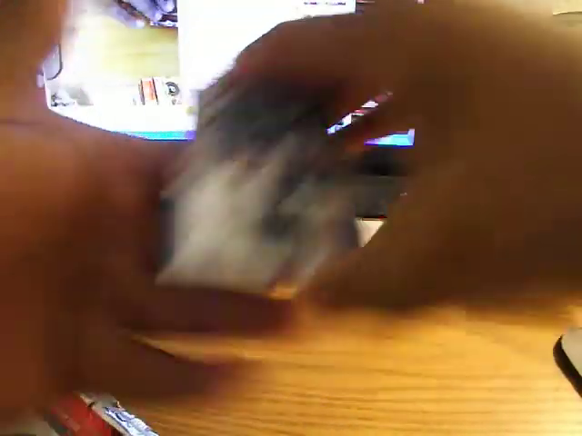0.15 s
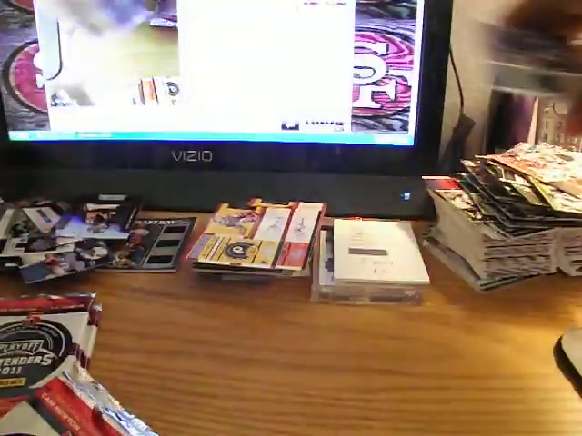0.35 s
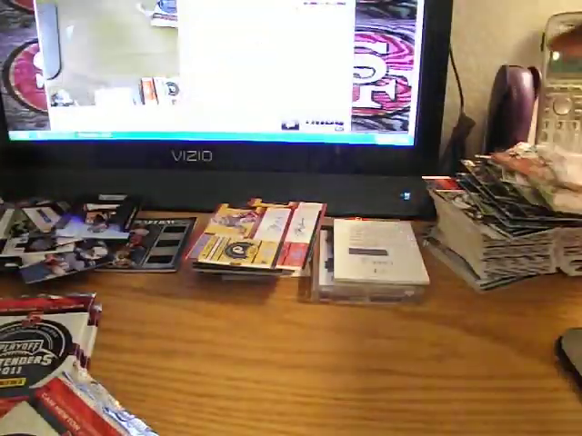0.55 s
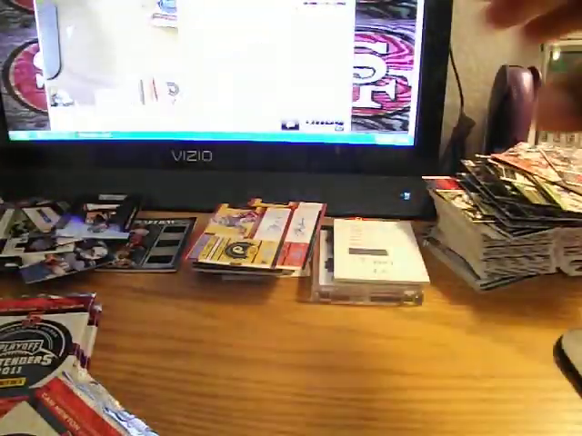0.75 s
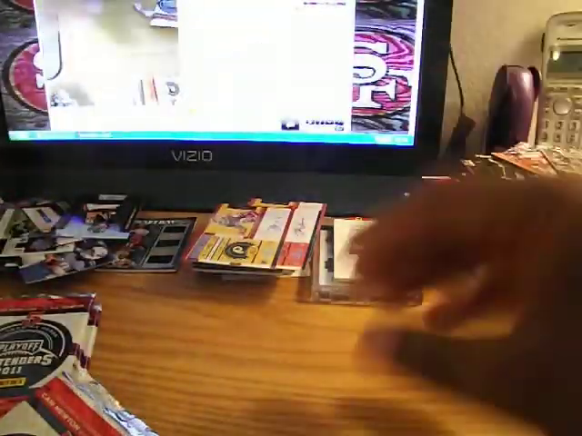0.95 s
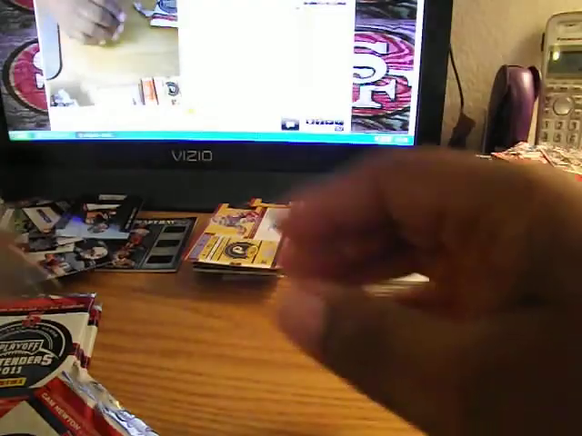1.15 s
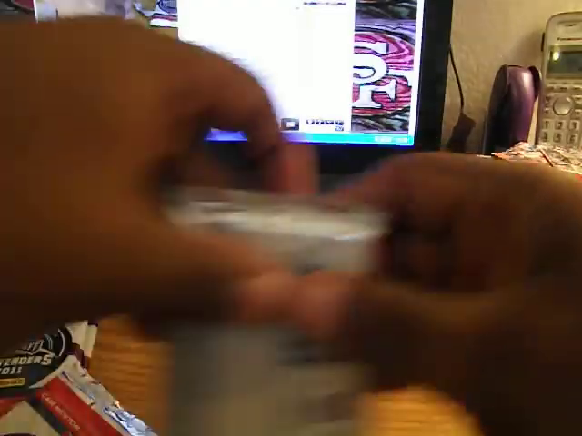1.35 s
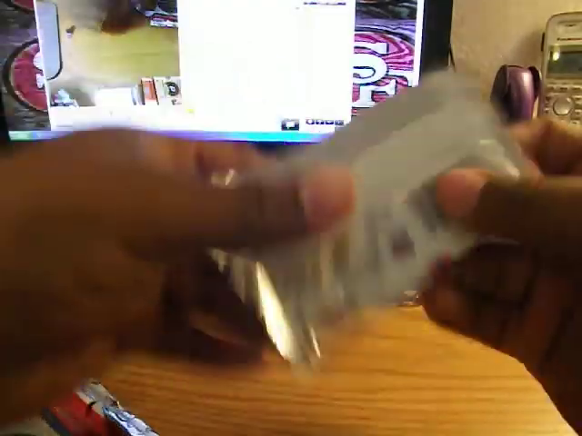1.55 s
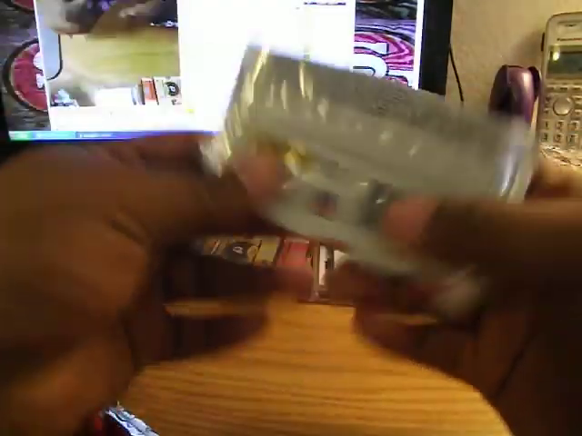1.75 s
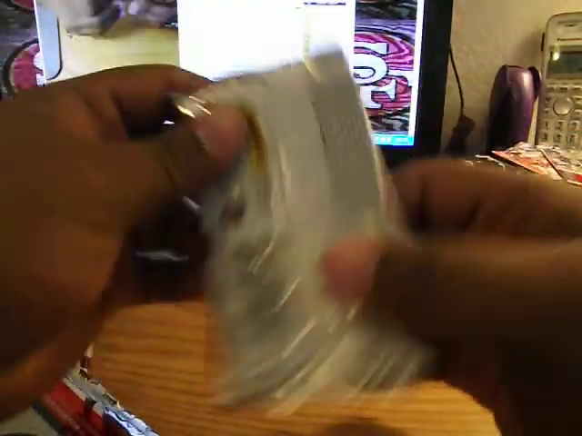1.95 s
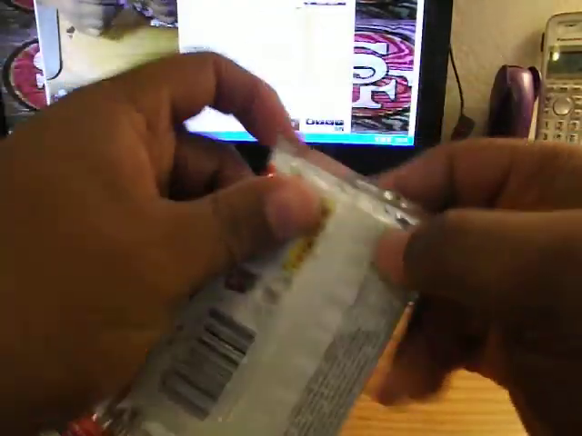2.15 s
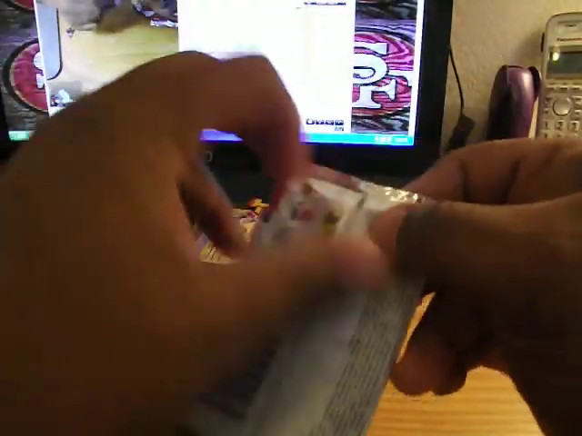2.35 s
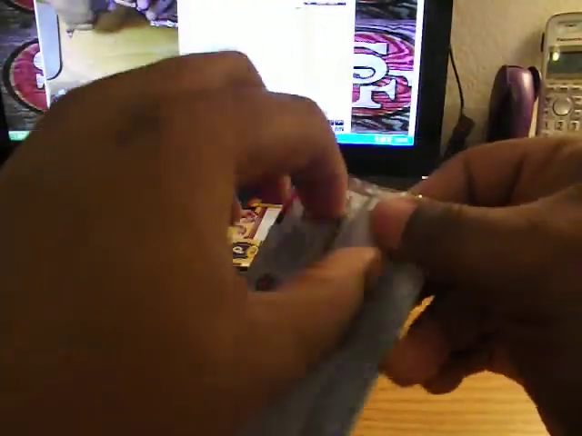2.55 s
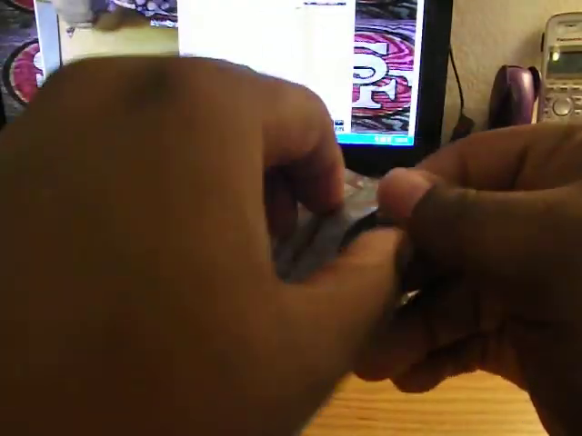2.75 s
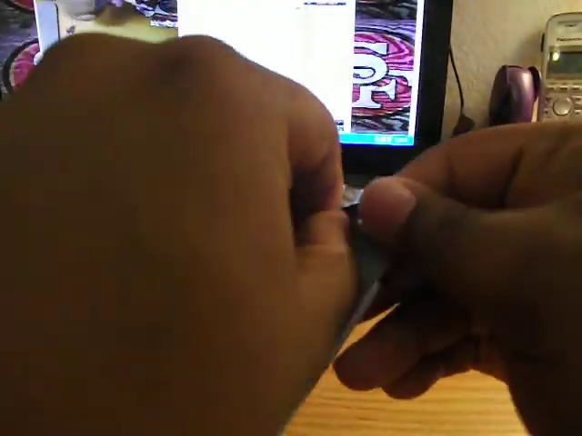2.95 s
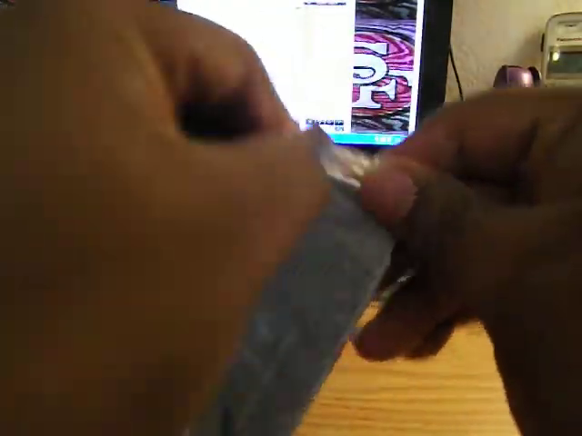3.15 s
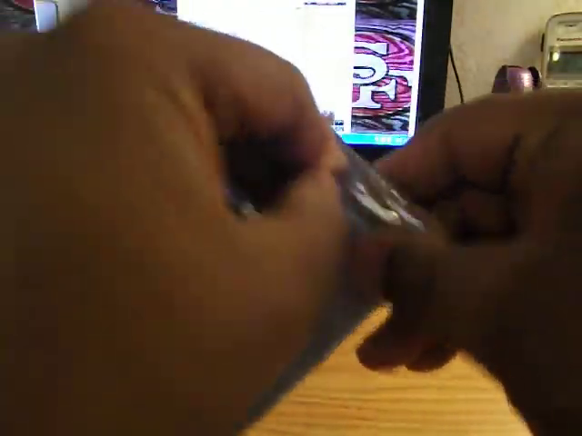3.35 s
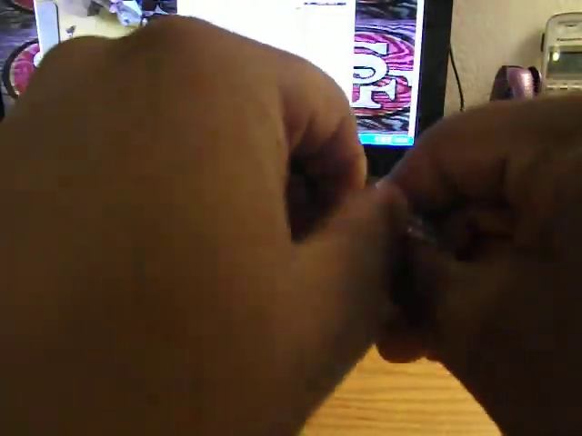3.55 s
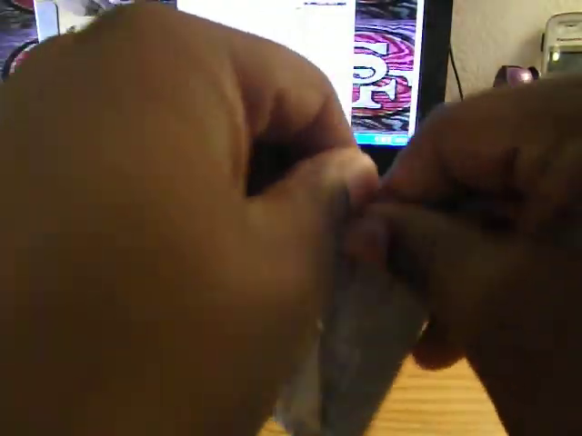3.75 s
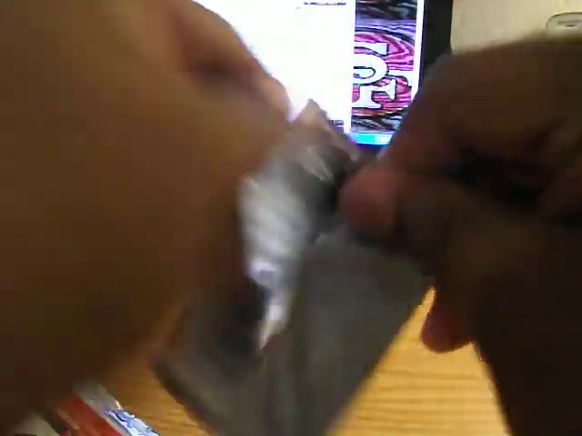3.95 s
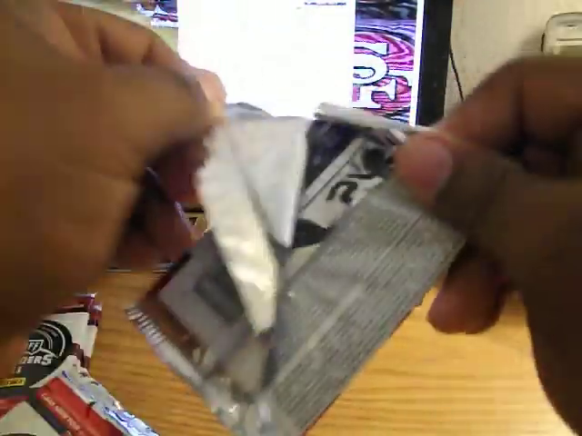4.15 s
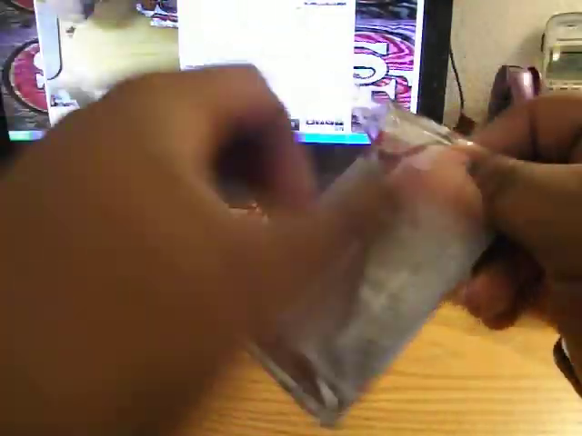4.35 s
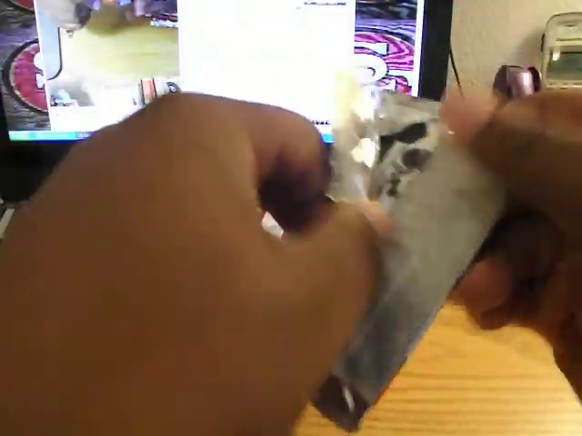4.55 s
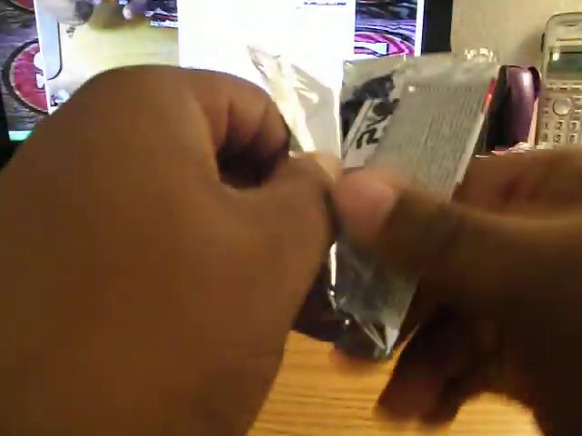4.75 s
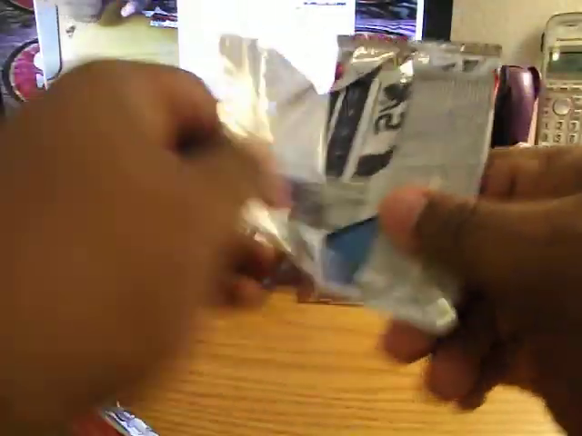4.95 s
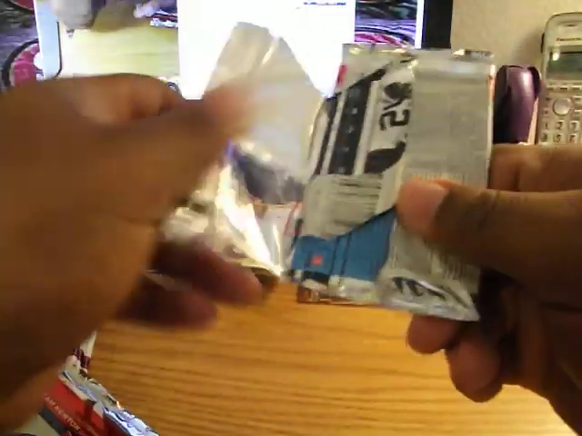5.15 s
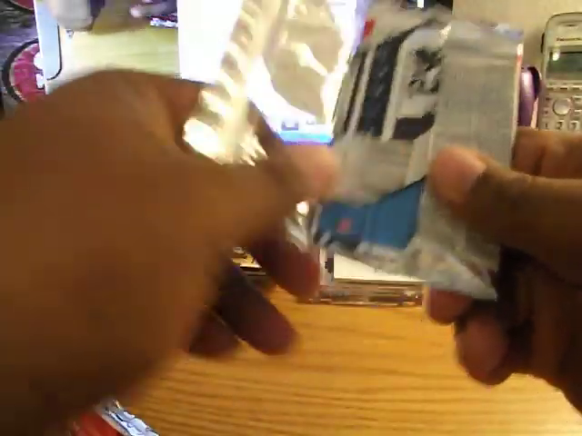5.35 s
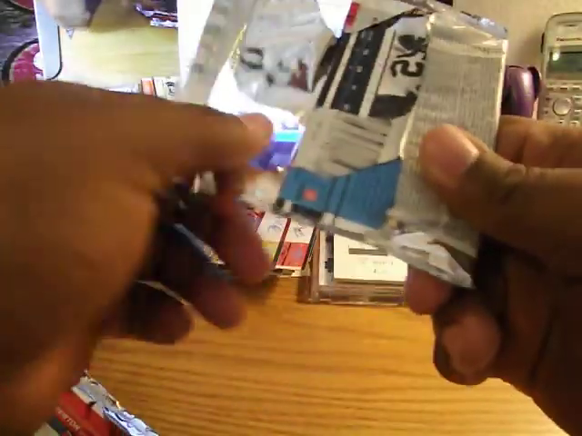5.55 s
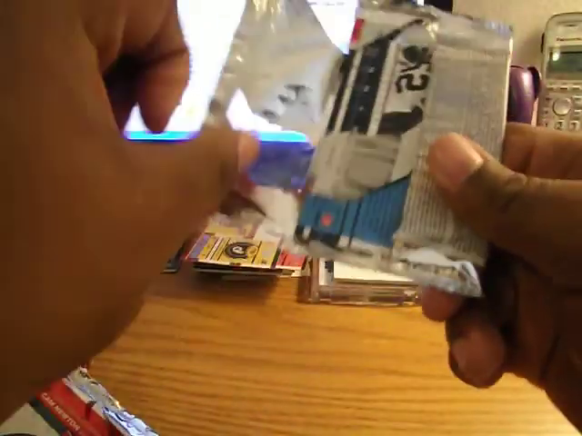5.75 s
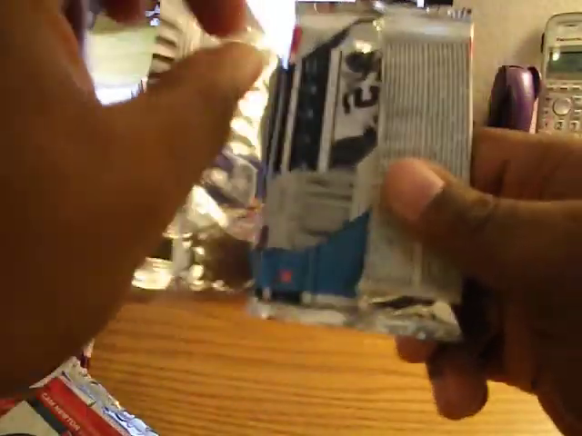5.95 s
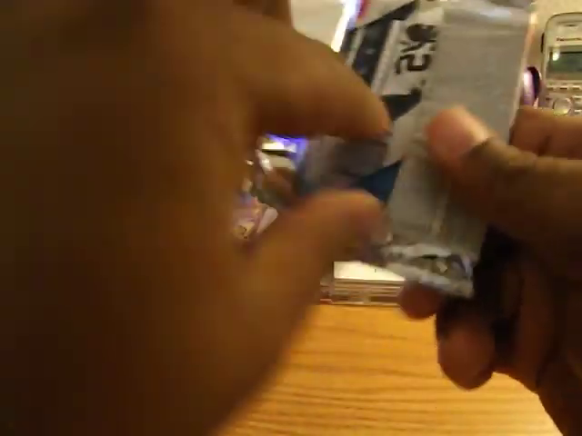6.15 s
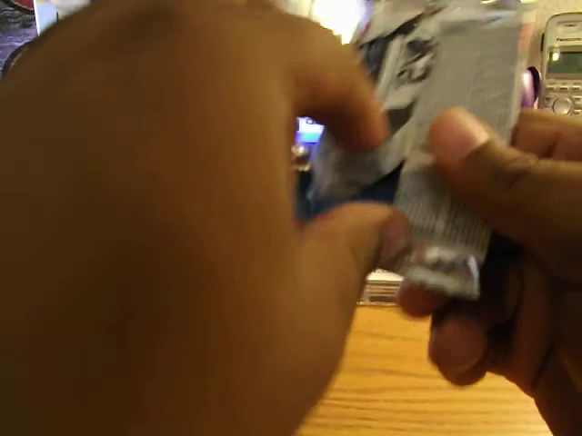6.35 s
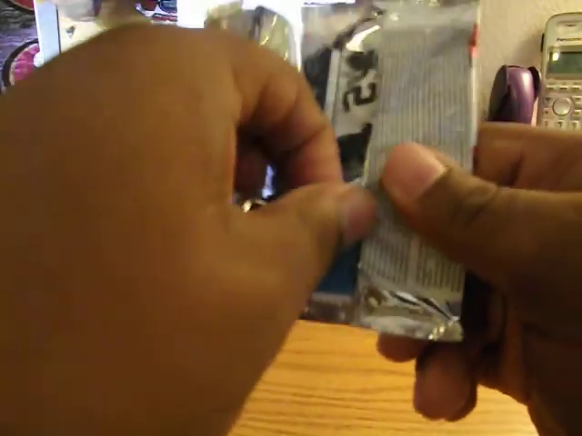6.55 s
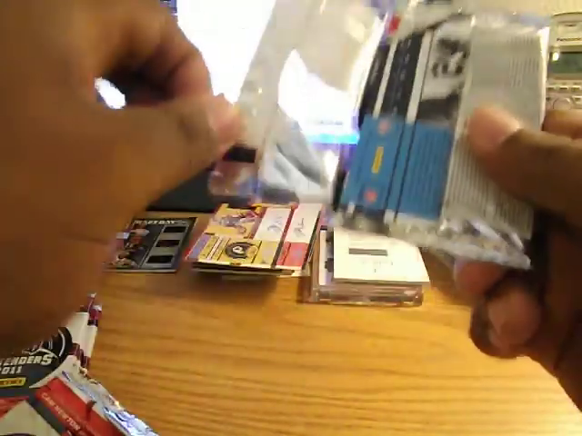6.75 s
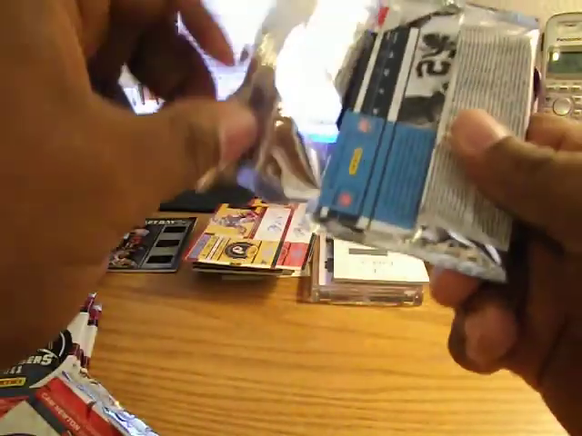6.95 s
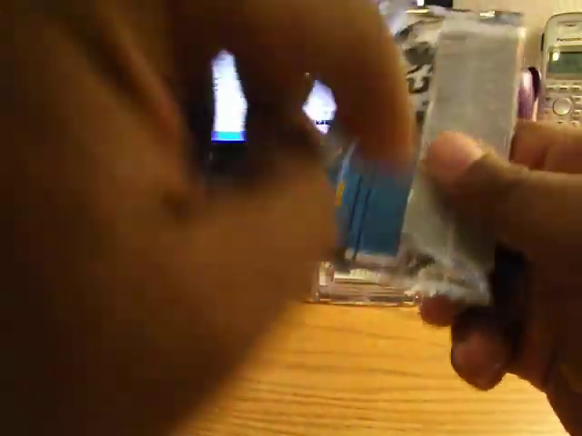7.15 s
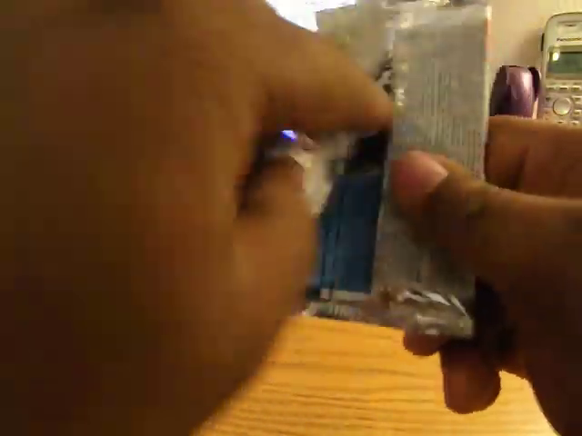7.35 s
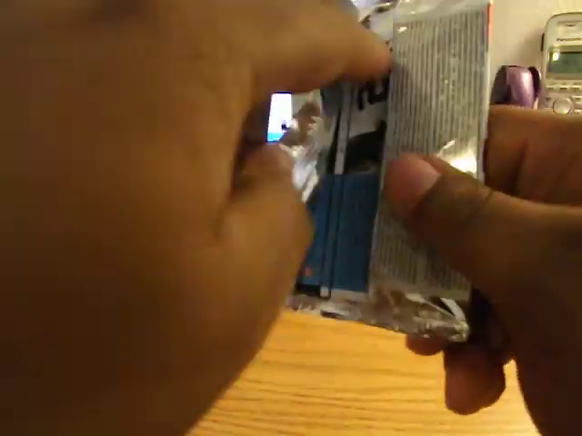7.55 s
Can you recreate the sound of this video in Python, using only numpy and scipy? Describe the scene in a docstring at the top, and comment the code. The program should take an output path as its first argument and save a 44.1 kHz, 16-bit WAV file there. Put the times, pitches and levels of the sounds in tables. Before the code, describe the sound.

A close, dull microphone in a small indoor room, with faint hiss, low rumble and hum throughout. At 0-0.4 s cards slide with a soft swelling brush and a finger bump; at 0.55 s they land on a stack with a light double tap. From 0.6 to 2 s foil is picked up: sparse ticks, a sharp snap near 0.95, light rustle. From 2 to 2.9 s pinching brings denser, brighter crackles. Hard crunching bursts come around 3.0 and 3.9 s, with smaller snaps between. Crinkling builds from 4.4 to the loudest rip at 4.85-4.97 s, slightly distorted with a hollow thump, and the level ducks afterwards. From 5 to 6.3 s, looser peeling rustles and low finger bumps; a very deep drone enters at 5.5 s and later sags. Strong tearing returns at 6.4-6.65 s, then quieter crinkles, and a short burst at 7.3 s before final snaps near 7.45 s.

```python
"""A foil pack is picked up, pinched, torn open and peeled back at a desk, close to a small microphone.
Creases snap one by one as noise bursts ringing a resonance, over a fine crinkle of random clicks.
First, cards are slid away as swelling filtered noise and dropped on a stack as short noise bursts.
Finger bumps are damped modes; behind lie noise-made hiss, sine hum and, later, a deep sine drone.
The microphone channel is dull above 5 kHz, ducks after loud rips and clips the sharpest snaps."""
import sys
import numpy as np
from scipy import signal
from scipy.fft import rfft, irfft
from scipy.io import wavfile
from scipy.ndimage import uniform_filter1d

SR = 44100
rng = np.random.default_rng(int(sys.argv[2]) if len(sys.argv) > 2 else 0)


def persist_wave(psi):
    """Save psi, clipped to +-1, as 16-bit WAV."""
    counts = np.round(np.clip(psi, -1, 1) * 32767).astype(np.int16)
    wavfile.write(sys.argv[1], SR, np.atleast_2d(counts).T)


N = 335601
TIME = np.arange(N) / SR

# cards landing on the stack; level is that of the card edge, rms over 0.1 s
# columns: start_s [s], level_db [dB]
CARD_LANDINGS = [(0.5475, -27.5), (0.5545, -35)]
# relative spectrum of a low rasp, shared by cards and foil
# columns: frequency_hz [Hz], density_db [dB per Hz]
RASP_SPECTRUM = [(150, -8.5), (350, -0.5), (500, -16.5), (800, 1.5), (1200, -6), (1650, 0.5), (2200, -5),
                 (3200, -50)]


def undb(db):
    """Amplitude ratio: 20 dB is a factor of ten."""
    return 10 ** (np.asarray(db) / 20)


def unit(x):
    """Power normalization: scale to rms 1."""
    return x / np.sqrt(np.mean(x ** 2) + 1e-18)


def add(out, s, x):
    """Superposition: mix a short sound in at time s."""
    i = max(int(s * SR), 0)
    out[i:i + len(x)] += x[:max(N - i, 0)]


def resonate(x, hz, width_hz):
    """Two-pole resonance with gain 1 at the centre."""
    return signal.lfilter(*signal.iirpeak(hz, hz / width_hz, fs=SR), x)


def colour(x, points):
    """Minimum-phase filtering: a causal response with the given spectrum; the result has rms 1."""
    hz, db = np.transpose(points)
    size = 4096
    bin_hz = np.arange(size // 2 + 1) * SR / size
    bin_db = np.interp(np.log(bin_hz + 1), np.log(hz), db)
    # folding the cepstrum onto positive times makes the response causal
    cepstrum = irfft(np.log(undb(bin_db)))[:size // 2]
    cepstrum[1:] *= 2
    response = irfft(np.exp(rfft(cepstrum, size)))
    return unit(signal.fftconvolve(x, response)[:N])


def walk(rate):
    """Low-pass noise: a slow random wander, smoothed twice over 1 / rate seconds."""
    k = int(SR / rate)
    steps = np.repeat(rng.standard_normal(N // k + 1), k)
    return unit(uniform_filter1d(uniform_filter1d(steps, k), k)[:N])


def tone(hz):
    """Phase accumulation: a sine of rms 1 that follows a pitch curve."""
    return unit(np.sin(2 * np.pi * np.cumsum(hz) / SR))


def grains(rate, spread_db):
    """Shot noise: random tiny clicks, many weak and a few strong, at a mean rate per second."""
    sizes = undb(spread_db * np.minimum(rng.exponential(size=N), 3)) * rng.choice([-1, 1], N)
    return sizes * (rng.random(N) < rate / SR)


def steady(x, span_s=0.04):
    """Power levelling: hold the mean power near 1 while single clicks still stand out."""
    local_power = np.abs(uniform_filter1d(unit(x) ** 2, int(span_s * SR)))
    return x / np.sqrt(local_power + 0.0086) / np.sqrt(np.mean(x ** 2))


def gesture(start_s, length_s, db, growth_db):
    """Amplitude envelope of a hand movement: quick attack before start_s, changing hold, exponential release."""
    attack_s, release_s = 0.02, 0.0086
    t = TIME - start_s
    progress = np.clip(t / length_s, 0, 1)
    attack = np.clip(1 + t / attack_s, 0, 1) ** 2
    release = np.exp(-np.maximum(t - length_s, 0) / release_s)
    return undb(db + growth_db * (progress - .5)) * attack * release


def gestures(rows):
    """Incoherent summation: the powers of several hand movements add."""
    return np.sqrt(sum(gesture(*row) ** 2 for row in rows))


def drone(start_s=5.5, rise_s=0.0486, level_db=-32, pitch_hz=31.75):
    """Frequency glide: a deep sine sets in quickly, then later sags steadily in pitch."""
    sag_s, sag_hz_per_s = 6.65, 3.2
    onset = np.clip((TIME - start_s) / rise_s, 0, 1)
    pitch_curve_hz = pitch_hz - sag_hz_per_s * np.maximum(TIME - sag_s, 0)
    return undb(level_db) * onset * tone(pitch_curve_hz)


def background(waver_db=0.6, waver_hz=.9, flicker_db=1.9):
    """Stationary noise and tones: room rumble, hiss with two resonances, wavering hum and the drone."""
    # relative spectrum of the room rumble: frequency_hz [Hz], density_db [dB per Hz]
    room_spectrum = [(20, 5.5), (60, -3), (100, -2), (135, -3), (165, -15), (200, -16.5), (320, -13.5),
                     (450, -21), (800, -24), (1400, -18.5), (2500, -15), (4500, -32), (6000, -21)]
    # resonances in the hiss: centre_hz [Hz], width_hz [Hz], level_db [dB, before the flicker]
    hiss_bands = [(1922, 110, -48), (4230, 280, -49)]
    # a fan and the mains hum, before the waver: pitch_hz [Hz], level_db [dB]
    hum_tones = [(95, -52), (119.6, -44.5), (299, -61.5)]
    air = undb(-39) * colour(rng.standard_normal(N), room_spectrum)
    hiss = 0
    for hz, width_hz, db in hiss_bands:
        band = unit(resonate(rng.standard_normal(N), hz, width_hz))
        hiss = hiss + undb(db + flicker_db * walk(12)) * band
    hum = sum(undb(db + waver_db * walk(18)) * tone(hz + waver_hz * walk(7)) for hz, db in hum_tones)
    return air + hiss + hum + drone()


def card_slide(peak_s=0.17, width_s=0.088, level_db=-39, rasp_db=-9):
    """Sliding friction: card on card gives a smooth swell of noise, rasping at the height of the movement."""
    # relative spectrum of the slide: frequency_hz [Hz], density_db [dB per Hz]
    slide_spectrum = [(800, -15), (1800, -15), (2700, 0), (3600, 4), (4400, -6.5), (6000, -29)]
    swell = np.exp(-((TIME - peak_s) / width_s) ** 2 / 2)
    friction = rng.standard_normal(N)
    rasp = undb(rasp_db) * swell ** 2 * colour(friction, RASP_SPECTRUM)
    return undb(level_db) * swell * (colour(friction, slide_spectrum) + rasp)


def rub(hz=330, width_hz=85):
    """Resonant friction: soft hollow rubbing while the hands grip, noise through one doubled resonance."""
    # start_s [s, end of the attack], length_s [s], level_db [dB, mid-stroke], growth_db [dB over the stroke]
    rub_strokes = [(0, 0.35, -47.5, 2), (1.88, 0.25, -48, 0.5), (2.3, 0.28, -48, 1.5),
                   (2.68, 0.25, -44.5, -4)]
    friction = rng.standard_normal(N)
    hollow = resonate(resonate(friction, hz, width_hz), hz, width_hz)
    return gestures(rub_strokes) * unit(hollow)


def fingers(bump_db=-2, reach_octaves=0.45):
    """Modal excitation: soft blows ring damped modes, chosen by where the finger lands; skin drags along."""
    # soft bumps of fingers on pack and desk; centre_hz is where the modes ring most
    # start_s [s], level_db [dB peak, before bump_db], centre_hz [Hz]
    bump_rows = [(0.203, -21, 660), (0.547, -31.5, 264), (0.951, -25, 644), (2.025, -32, 270),
                 (2.089, -35, 680), (2.621, -28.5, 676), (2.959, -22.5, 880), (3.872, -20.5, 880),
                 (4.19, -28.5, 720), (4.419, -27.5, 667), (4.89, -20, 680), (4.945, -5, 724),
                 (5.525, -22.5, 300), (5.57, -26, 271), (5.676, -27, 323), (6.061, -30, 233),
                 (6.109, -21.5, 265.5), (6.349, -32.5, 260), (6.511, -17, 290), (6.635, -12.5, 700),
                 (7.32, -35, 277), (7.467, -23, 279)]
    # what a bump rings with: mode_hz [Hz, before 3 % random detuning], level_db [dB], t60_s [s]
    bump_modes = [(170, -8, 0.067), (261, 9.5, 0.11), (297.6, 6, 0.082), (446, 3.5, 0.17),
                  (600, -9.5, 0.07), (674, -2.5, 0.027), (896, -0.5, 0.07)]
    # skin dragging over the pack:
    # start_s [s, end of the attack], length_s [s], level_db [dB, mid-stroke], growth_db [dB over the stroke]
    drag_strokes = [(0, .27, -50, 4), (3.86, 0.031, -38.5, 8), (4.18, 0.054, -46.5, -2),
                    (4.41, 0.35, -54, -1), (4.78, 0.19, -44, 28), (5.28, 0.58, -48, -0.5),
                    (6.01, .14, -41.5, 3), (6.24, 0.12, -38.5, 2), (6.88, .05, -45, -1),
                    (7.28, 0.37, -48.5, -7)]
    # relative spectrum of the drag: frequency_hz [Hz], density_db [dB per Hz]
    skin_spectrum = [(60, -14), (170, 1.5), (260, 0.5), (400, -1), (600, -15), (1200, -30.5)]
    out, t = np.zeros(N), np.arange(SR // 8) / SR
    for s, db, centre_hz in bump_rows:
        ring = 0
        for hz, mode_db, t60_s in bump_modes:
            distance = np.log2(hz / centre_hz) / reach_octaves
            share = 1 / (1 + distance ** 2) * rng.choice([-1, 1])
            detuned_hz = hz * (1 + .03 * rng.standard_normal())
            decay = undb(mode_db - 60 * t / t60_s)
            ring = ring + share * decay * np.sin(2 * np.pi * detuned_hz * t)
        add(out, s, undb(db + bump_db) * ring / np.abs(ring).max())
    return out + gestures(drag_strokes) * colour(grains(rate=260, spread_db=2.0), skin_spectrum)


def cards(rise_s=0.0019, tail_s=0.038, tail_db=-22, stack_db=-17):
    """Impact excitation: two cards meet the stack in quick succession, which knocks and rustles as it settles."""
    out, t = np.zeros(N), np.arange(SR // 10) / SR
    for s, db in CARD_LANDINGS:
        # the air between the cards cushions the landing
        contact = t / rise_s * np.exp(-t / rise_s) + undb(tail_db) * np.exp(-t / tail_s)
        push = contact * rng.standard_normal(len(t))
        edge = unit(resonate(push, 3140, 1800))
        knock = unit(resonate(push, 800, 220))
        add(out, s, undb(db) * (edge + undb(stack_db) * knock))
    return out


def handling(hold_db=-44, hold_rasp_db=-55):
    """Incoherent summation: gains of fine rustle and low rasp, each stroke over the foil being held."""
    # each grip, pull or rip of the foil: start_s [s, end of the attack], length_s [s],
    # rustle_db [dB, mid-stroke], growth_db [dB over the stroke], rasp_db [dB re rustle]
    foil_strokes = [(0.562, 0.1, -39, -5, -15), (0.759, .14, -39, -5, -23), (0.905, 0.078, -31.5, 1, -15),
                    (1.29, 0.01, -33, -2, -13), (1.742, .16, -38.5, 9, -14), (2.082, 0.049, -33, -1, -6.5),
                    (2.214, 0.095, -38, 2, -5), (2.393, .025, -28.5, 1, -23), (2.526, 0.031, -30, 9, -9.5),
                    (2.624, 0.022, -22.5, -6, -25), (2.817, .08, -34, 9, -12.5),
                    (2.934, 0.031, -29, 16.5, -22), (2.979, 0.04, -12.5, 15, -20.5),
                    (3.039, 0.086, -23, -12, -25), (3.216, 0.077, -30, -8, -13.5),
                    (3.335, 0.091, -30.5, 2, -14), (3.553, 0.011, -32.5, -13, -23),
                    (3.699, 0.045, -29.5, 4, -15), (3.825, 0.017, -30, 3, -36), (3.884, .06, -9.5, 4, -20),
                    (3.95, 0.084, -20.5, -3, -6), (4.196, 0.061, -26, -7.5, -11),
                    (4.475, 0.047, -22, 10, -11.5), (4.544, 0.091, -27.5, 7, -11.5),
                    (4.70, 0.16, -26, 12.5, -13.5), (4.859, 0.098, -11, 16, -5),
                    (4.982, 0.23, -33.5, -12, -6.5), (5.247, 0.13, -31.5, -5, -5.5),
                    (5.319, 0.16, -26.5, -7.5, -8), (5.51, 0.17, -29, -1.5, -4.5),
                    (5.713, 0.11, -37, 2, -5.5), (6.028, 0.16, -37, -8, -5), (6.242, 0.24, -30.5, -0.5, -6),
                    (6.463, 0.15, -21, 5, -18.5), (6.606, 0.039, -13, 6.5, -12),
                    (6.673, 0.096, -32, -3.5, -13.5), (6.885, 0.094, -32.5, -8.5, -13),
                    (7.011, 0.019, -33, 7, -9.5), (7.119, 0.021, -34, 3, -18),
                    (7.224, 0.097, -28.5, 22.5, -13.5), (7.328, .035, -26, 5, -13.5),
                    (7.43, 0.058, -31, 9, -6)]
    held = TIME > CARD_LANDINGS[0][0]
    fine = gestures(row[:4] for row in foil_strokes)
    rasp = gestures((s, length, db + rasp_db, growth) for s, length, db, growth, rasp_db in foil_strokes)
    return np.hypot(fine, undb(hold_db) * held), np.hypot(rasp, undb(hold_rasp_db) * held)


def crinkle(fine, rasp, crest=3.6, facet_width_hz=560, facet_db=2, slide_db=-13):
    """Crackling noise: countless small creases give way as the foil slides and tears."""
    # relative spectrum of the fine rustle: frequency_hz [Hz], density_db [dB per Hz]
    crinkle_spectrum = [(500, -36), (1200, -7.5), (1700, -10.5), (2200, 1.5), (2900, 17.5), (3300, 27),
                        (3800, 2.5), (4500, 8.5), (5200, -11), (6000, -35)]
    tearing = unit(grains(rate=420, spread_db=2.5)) + undb(slide_db) * rng.standard_normal(N)
    facets = 0
    for hz in (3000, 2730, 2880, 3100, 3920, 4500, 4320):
        facets = facets + resonate(grains(rate=70, spread_db=1.5), hz, facet_width_hz)
    foil = steady(colour(tearing, crinkle_spectrum) + undb(facet_db) * unit(facets))
    foil = crest * np.tanh(foil / crest)  # a small crease stores only so much energy
    return fine * foil + rasp * steady(colour(tearing, RASP_SPECTRUM))


def burst(t, length_s, break_db=-3):
    """Impulsive release: a crease breaks at once, then a flurry of tiny slips dies away."""
    push = rng.standard_normal(len(t)) * np.exp(-(t / length_s) ** 2)
    push /= np.linalg.norm(push)
    push[0] += undb(break_db)
    return push


def snaps(rows, ring_width_hz=1100, neighbour_width_hz=380, neighbour_db=-7, edge_db=-6):
    """Buckling: a crease's own facet rings for a millisecond or two; sheet and pack answer lower down."""
    lag_s, body_db, thud_db = .0003, -1, -10
    slip_s, slip_octaves = 0.0033, .55  # typical slipping time after the break, and its random spread
    out, t = np.zeros(N), np.arange(SR // 50) / SR
    edge_band = signal.butter(2, [2500, 5800], "band", fs=SR, output="sos")
    body_band = signal.butter(2, [1450, 2150], "band", fs=SR, output="sos")
    thud_band = signal.butter(2, [580, 1120], "band", fs=SR, output="sos")
    for s, db, hz, body in rows:
        octaves = slip_octaves * np.clip(rng.standard_normal(), -2, 1)
        push = burst(t, slip_s * 2 ** octaves)
        facet = unit(resonate(resonate(push, hz, ring_width_hz), hz, ring_width_hz))
        # a neighbouring facet of another size rings along
        neighbour = unit(resonate(push, rng.uniform(3090, 4310), neighbour_width_hz))
        edge = unit(signal.sosfilt(edge_band, push))
        foil = unit(facet + undb(neighbour_db) * neighbour + undb(edge_db) * edge)
        sheet = undb(body + body_db) * unit(signal.sosfilt(body_band, push))
        pack = undb(body + thud_db) * unit(signal.sosfilt(thud_band, push))
        # nearly all the energy lies in the first quarter of the 20 ms; halving sets the rms over 5 ms
        add(out, s + lag_s, undb(db) * (foil + sheet + pack) / 2)
    return out


def stray_snaps(rustle, count=170, max_db=-14):
    """Random point process: lesser creases snap by chance, as loud as the rustle around them allows."""
    level_db, spread_db, pitch_hz, spread_octaves, body_db = 1, 5.5, 3295, 0.12, -11
    times = rng.uniform(CARD_LANDINGS[0][0], TIME[-1], count)
    size, pitch, body = np.clip(rng.standard_normal((count, 3)), -2, 2).T
    rustle_db = 20 * np.log10(rustle[(times * SR).astype(int)] + 1e-9)
    db = np.minimum(rustle_db + level_db + spread_db * size, max_db)
    ring_hz = pitch_hz * 2 ** (spread_octaves * pitch)
    return zip(times, db, ring_hz, body_db + spread_db * body)


def room(x, t60_s=0.37, wet_db=-16):
    """Reflection and reverberation: nearby surfaces echo at once; the small furnished room adds a tail."""
    # early echoes from desk, hands and screen: delay_s [s], gain [amplitude ratio]
    early_echoes = [(.0017, 0.3), (.0036, 0.088), (.0052, .07), (0.0116, 0.045)]
    t = np.arange(SR // 3) / SR
    tail = rng.standard_normal(len(t)) * undb(-60 * t / t60_s) * (t > .004)
    response = undb(wet_db) * tail / np.sqrt(np.sum(tail ** 2))
    response[0] = 1
    for s, gain in early_echoes:
        response[int(s * SR)] += gain
    return signal.fftconvolve(x, response)[:N]


def scene():
    """Superposition: hands, foil and cards sound in the room, over the background."""
    # the clearest creases that snap: start_s [s], level_db [dB of the foil's ring over 5 ms],
    # ring_hz [Hz], body_db [dB re level, before the offsets of sheet and pack]
    clear_creases = [(.6367, -24.5, 3680, -12.5), (.7065, -27, 3000, -11), (.8522, -27.5, 3070, -19),
                     (.9051, -21.5, 2980, -32), (.9512, -11.5, 4000, -12.5), (1.0428, -26, 3340, -10),
                     (1.2806, -35, 3360, -20), (1.3623, -30.5, 3270, -10), (1.4022, -30, 3540, -4.5),
                     (1.52, -38, 2980, 2), (1.572, -41, 3010, 4), (1.6423, -23, 3270, -11),
                     (1.6633, -17, 3220, -7.5), (1.721, -23, 3240, -27), (1.7561, -31, 2720, -20),
                     (1.7708, -27.5, 3020, -15), (1.8405, -25, 3560, -3.5), (1.8606, -25, 3120, -14),
                     (1.891, -21.5, 3980, -21), (1.9338, -27.5, 3080, -16), (2.0036, -31.5, 2980, -5),
                     (2.0321, -26, 3100, -5), (2.0814, -19, 2630, -25), (2.0901, -11.5, 4100, -12.5),
                     (2.1173, -24.5, 3290, -4.5), (2.1402, -22.5, 3160, -31), (2.1774, -23.5, 2980, -13),
                     (2.2388, -17.5, 3740, -13), (2.2554, -15, 4420, -31), (2.2789, -15.5, 3310, -16),
                     (2.2989, -27, 3890, -8), (2.3581, -20, 3290, -6), (2.3942, -19.5, 3210, -27),
                     (2.406, -22, 3100, -30), (2.4155, -18.5, 4850, -22), (2.469, -29.5, 3360, 1),
                     (2.48, -20.5, 2920, -12.5), (2.5304, -16.5, 3300, -13.5), (2.5515, -17, 4070, -23),
                     (2.5702, -24, 4150, -13), (2.6002, -21.5, 3550, -25), (2.6202, -11, 3350, -11.5),
                     (2.6388, -21, 3300, -22.5), (2.6692, -11.5, 3900, -15), (2.74, -17, 3140, -40),
                     (2.7804, -20, 3210, -16), (2.8542, -13, 3900, -16.5), (2.8664, -21, 4300, -18),
                     (2.893, -23, 3780, -12), (2.9598, -19.5, 3600, -5.5), (2.979, -9, 3800, -8),
                     (2.9959, -17, 3900, -4), (3.0127, -7, 3320, -27), (3.0217, -13, 3340, -5),
                     (3.0466, -8.5, 3340, -18), (3.0682, -17, 3380, -11), (3.0882, -17, 3680, -3.5),
                     (3.1328, -14, 2860, -29), (3.2414, -21.5, 3300, -11), (3.3105, -22, 3010, -5),
                     (3.3352, -19.5, 3600, -10.5), (3.3446, -18, 3270, -14), (3.3725, -12.5, 3830, -17.5),
                     (3.3846, -12, 3440, -26), (3.5457, -21.5, 4340, -20), (3.6431, -11, 3920, -26),
                     (3.7053, -18.5, 5030, -10.5), (3.7404, -23, 3100, -15), (3.7643, -26.5, 3550, -12),
                     (3.8153, -14, 3160, -33), (3.8372, -23, 3120, -16), (3.873, -10, 3090, -1.5),
                     (3.8855, -13, 3670, -14.5), (3.9071, -7.5, 3830, -15), (3.9264, -10, 3330, -11.5),
                     (3.9404, -8, 3430, -17), (3.9608, -8, 3160, -6), (4.089, -22.5, 3120, 3),
                     (4.1455, -22, 3920, -6.5), (4.1894, -14, 3080, -15), (4.2231, -29.5, 3800, -21.5),
                     (4.2328, -17, 2800, -6.5), (4.2946, -23, 3040, -2), (4.4214, -25.5, 3092, -3.5),
                     (4.4495, -15.5, 3200, -18), (4.479, -20, 3230, -23), (4.4964, -16, 3080, -18),
                     (4.5163, -12.5, 3100, -32.5), (4.5873, -14.5, 2870, -15.5), (4.6139, -14, 2940, -10),
                     (4.7484, -14.5, 3600, -10.5), (4.7944, -14, 3110, -23), (4.8075, -15, 3800, -19),
                     (4.8341, -14, 3010, -11), (4.8676, -14.5, 2980, -7), (4.8787, -14, 3500, -13),
                     (4.8845, -9.5, 3250, -6), (4.8996, -4.5, 4060, -18), (4.908, -6, 2970, 0.5),
                     (4.9316, -15, 2950, -12), (4.9435, 1, 2960, -10), (4.9568, -1, 2950, -7),
                     (4.962, -0.5, 2950, -1.5), (5.0025, -12, 2650, -1.5), (5.0587, -20, 3050, 4),
                     (5.261, -22.5, 3130, -17.5), (5.3318, -24.5, 2960, 1), (5.3575, -13, 3210, -21),
                     (5.3922, -11, 2940, -18), (5.4916, -29.5, 3750, 0), (5.5245, -17, 2660, -2),
                     (5.6131, -20, 3250, -0.5), (5.6713, -22.5, 3020, -10), (5.7598, -19, 2770, -7.5),
                     (5.9565, -31.5, 2780, 5), (6.1514, -24, 3200, -15), (6.2331, -19, 2920, -5),
                     (6.2494, -16.5, 3000, -13), (6.3562, -17.5, 3000, -6), (6.3784, -28, 3060, -10),
                     (6.398, -22.5, 2850, -17), (6.4295, -17.5, 3920, -9), (6.4393, -11.5, 3040, -15.5),
                     (6.4843, -22, 3180, -8), (6.5092, -12.5, 3230, -7), (6.5467, -13, 3160, -8.5),
                     (6.613, -18, 3000, -16), (6.6305, -9, 3180, -7.5), (6.6395, -11, 3140, -9),
                     (6.7429, -24.5, 3230, -4.5), (6.9243, -26.5, 3960, -12), (7.0236, -27.5, 3540, -3.5),
                     (7.218, -29.5, 3570, -18), (7.3552, -18, 3470, -12), (7.3644, -18.5, 3150, -6),
                     (7.4525, -13.5, 4360, -33), (7.4641, -17, 3140, -13), (7.5897, -28.5, 3100, -10)]
    fine, rasp = handling()
    foil = snaps(clear_creases) + snaps(stray_snaps(fine)) + crinkle(fine, rasp)
    return (room(foil + card_slide() + cards() + fingers() + rub()) + background())[None]


def smooth(x, time_s):
    """Exponential averaging: a one-pole lag."""
    keep = np.exp(-1 / (time_s * SR))
    return signal.lfilter([1 - keep], [1, -keep], x)


def gain_control(x, threshold_db=-20.5, ratio=7.4):
    """Dynamic compression: turn down quickly above the threshold, and come back at a steady rate."""
    detector_s, duck_s, recover_db_per_s = 0.016, 0.011, 41
    level_db = 10 * np.log10(smooth(x ** 2, detector_s) + 1e-12)
    over_db = np.maximum(level_db - threshold_db, 0) * (1 - 1 / ratio)
    # a running maximum against a rising ramp lets the cut fall only at the recovery rate
    recovery_db = recover_db_per_s * TIME
    cut_db = np.maximum.accumulate(over_db + recovery_db, axis=-1) - recovery_db
    return x * undb(-smooth(cut_db, duck_s))


def record(dry, treble_hz=5350, clip_level=0.67, top_hz=16000):
    """Band limiting and clipping: a dull channel with gain control; the sharpest snaps spit a little treble."""
    treble_cut = signal.butter(12, treble_hz, fs=SR, output="sos")
    narrow = signal.sosfiltfilt(treble_cut, gain_control(dry))
    narrow = signal.sosfilt(signal.ellip(8, .2, 70, 6000, fs=SR, output="sos"), narrow)
    clipped = np.clip(narrow, -clip_level, clip_level)
    return signal.sosfiltfilt(signal.ellip(8, .1, 50, top_hz, fs=SR, output="sos"), clipped)


dry = scene()
out = record(dry)
persist_wave(out)
```